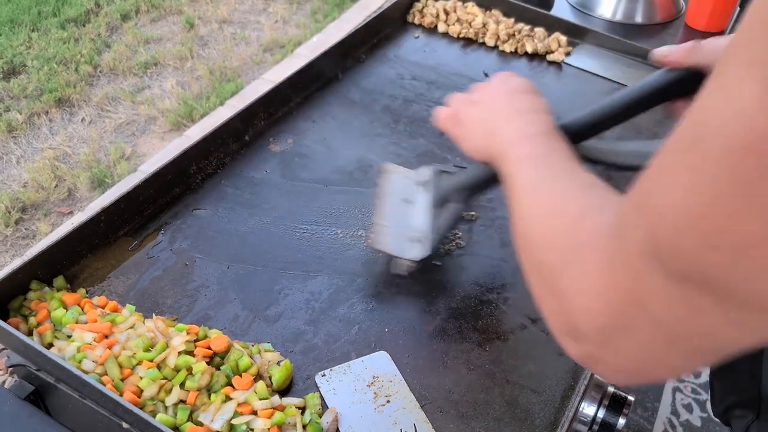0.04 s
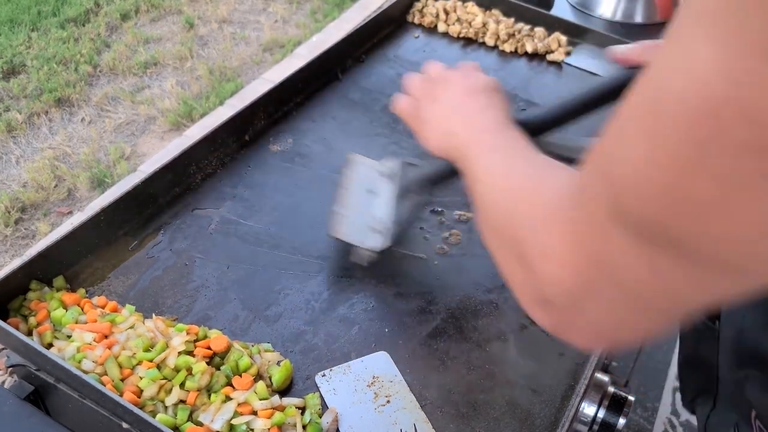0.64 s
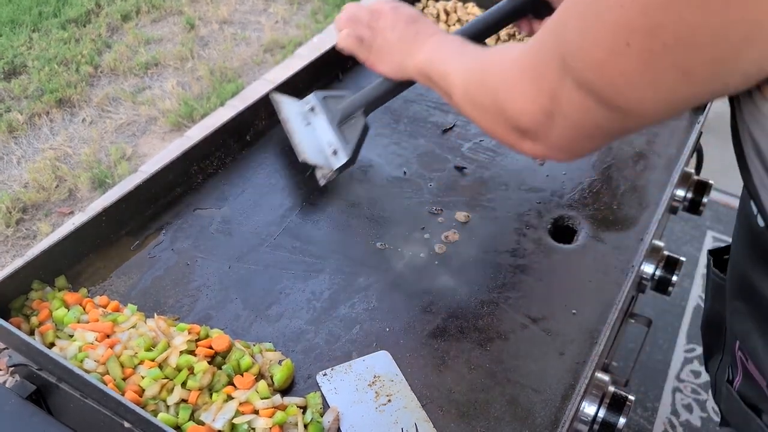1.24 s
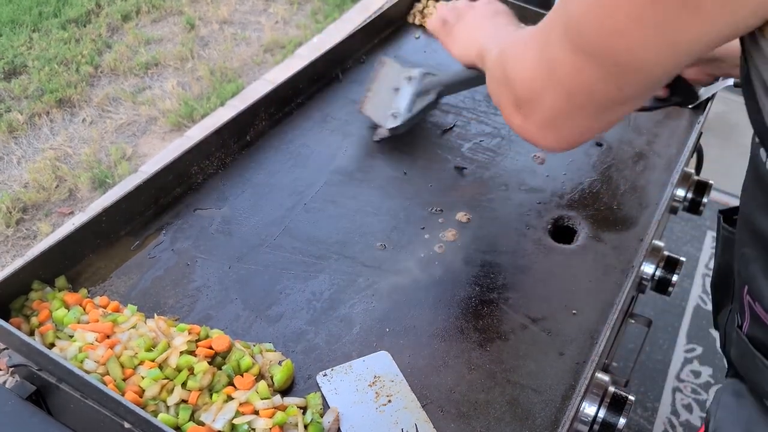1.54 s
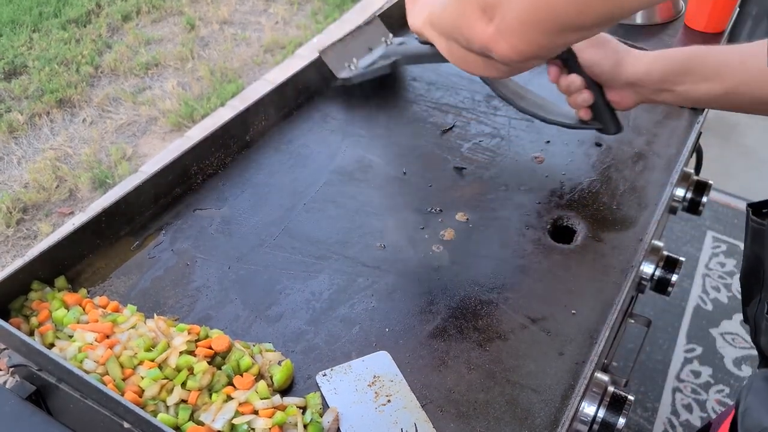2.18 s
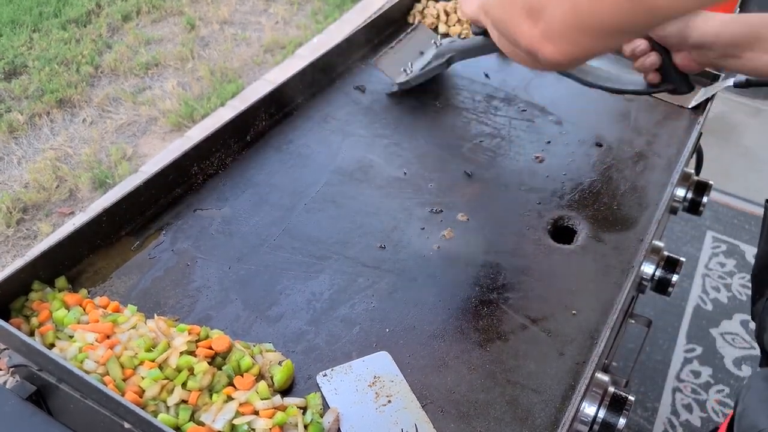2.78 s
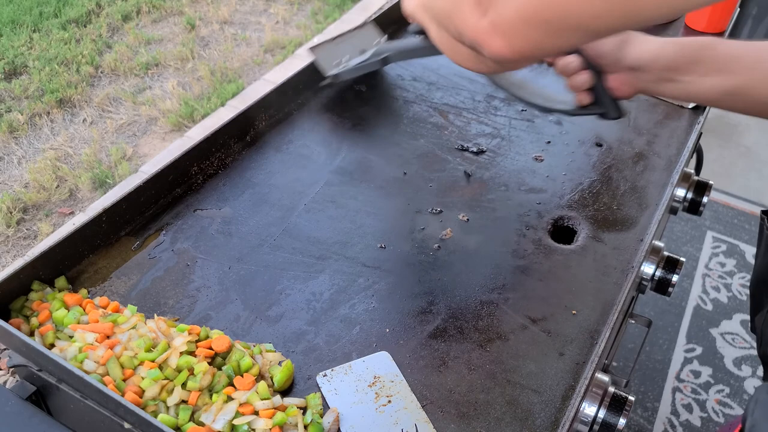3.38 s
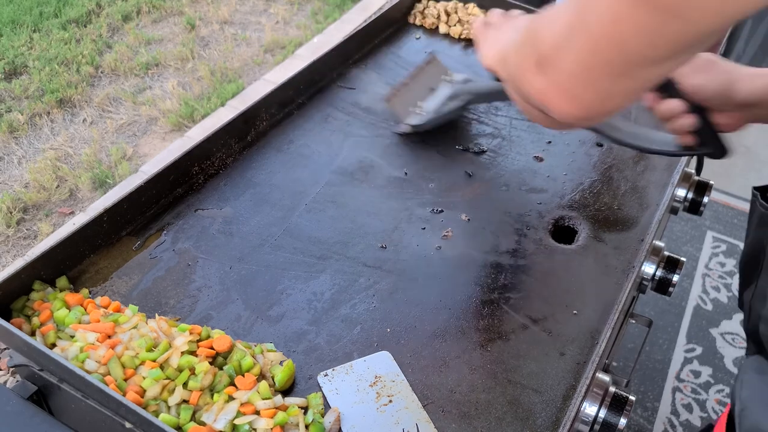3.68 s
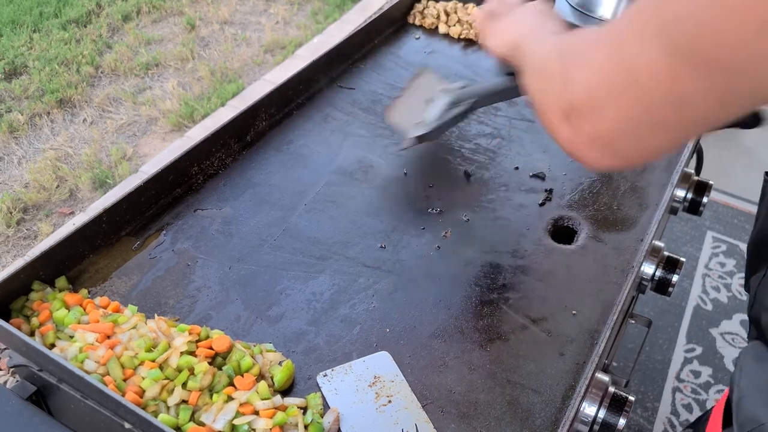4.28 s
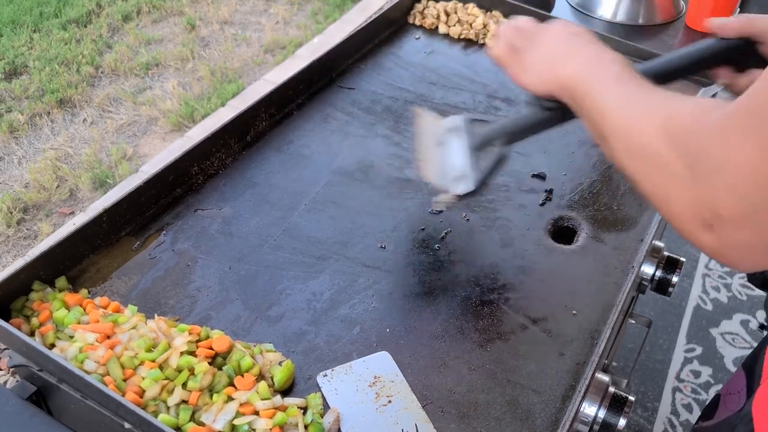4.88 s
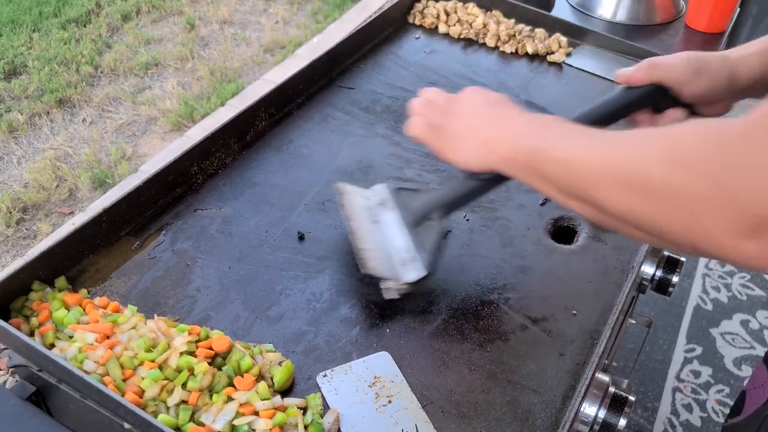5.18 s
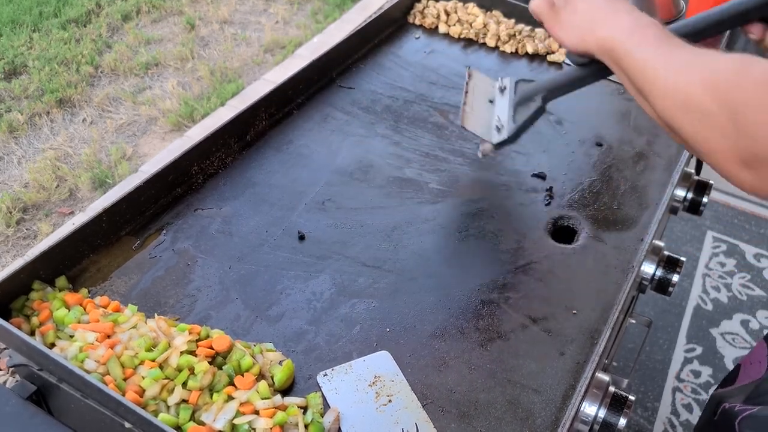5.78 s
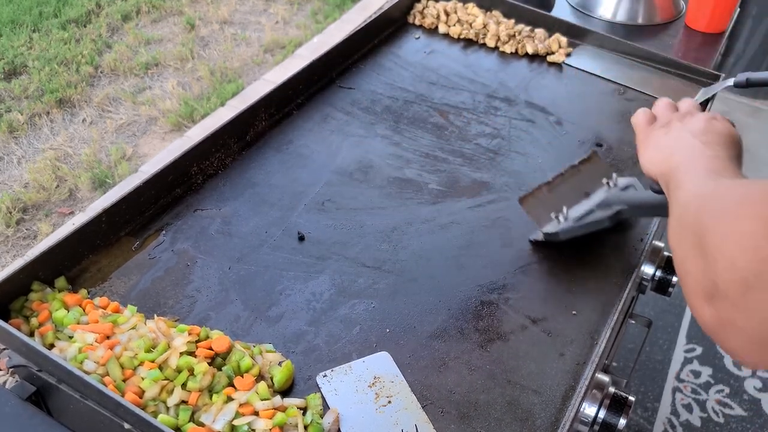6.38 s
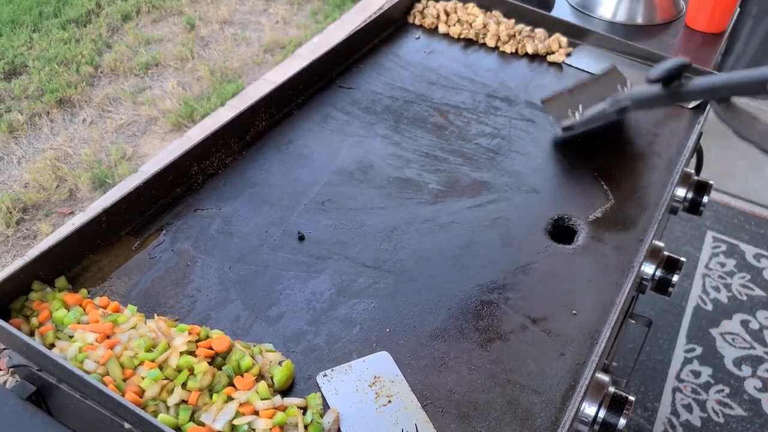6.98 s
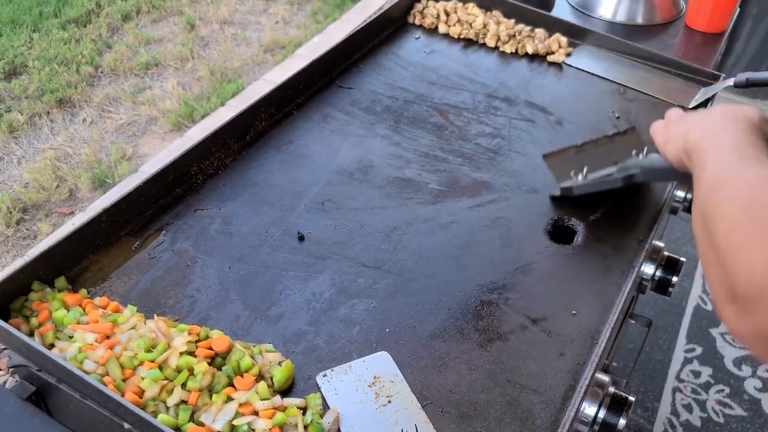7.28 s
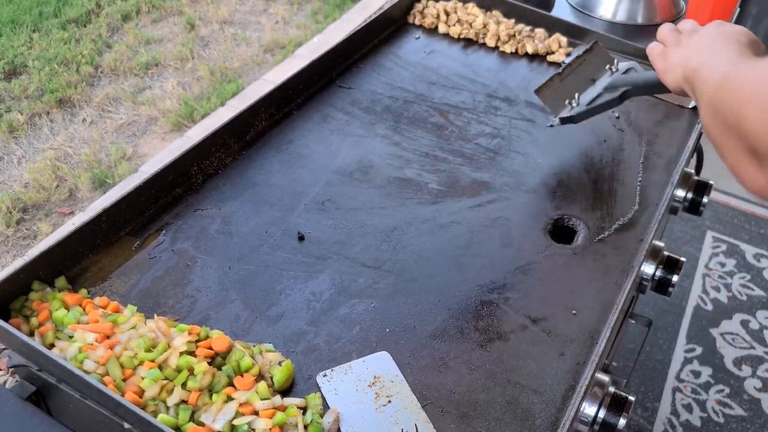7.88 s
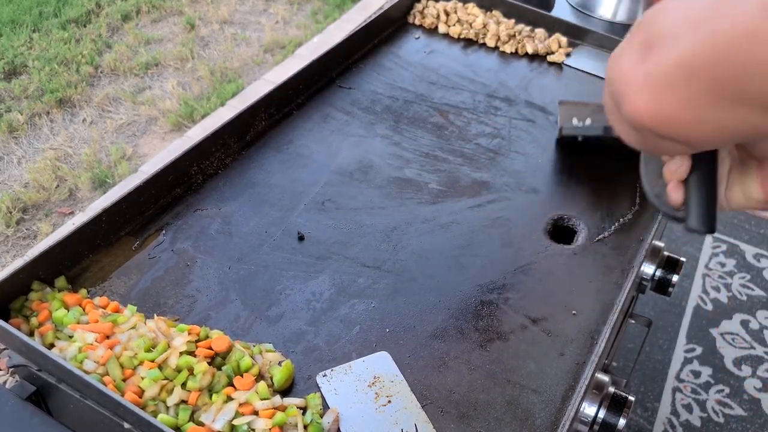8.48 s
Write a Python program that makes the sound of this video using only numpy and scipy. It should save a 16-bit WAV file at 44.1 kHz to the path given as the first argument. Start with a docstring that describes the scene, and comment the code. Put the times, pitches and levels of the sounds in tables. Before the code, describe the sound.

Water sizzles on a hot outdoor griddle as a steel scraper rasps across it in short, gritty strokes, each raising a burst of hiss. The blade clacks down on the heavy plate, judders along the rim and hits it twice with a ringing clang. More strokes and knocks follow while the sizzle fades, leaving softer scraping over the low rumble and hiss of gas burners. The sound is close, with no echo.

```python
"""Water sizzles on a hot gas griddle outdoors as a steel scraper rasps over it in short strokes,
each pushing water onto dry steel in a burst of hiss. Just before 1 s the scraper is set down:
a corner touches, the edge slaps, the blade settles. It then judders along the rim and hits it twice.
More strokes and landings follow while the water boils away. By 6 s the sizzle is faint,
and the scraper works on over the rumble and hiss of the burners."""
import sys
import numpy as np
from scipy import signal
from scipy.fft import rfft, irfft
from scipy.io import wavfile
from scipy.ndimage import uniform_filter1d

SR = 44100
rng = np.random.default_rng(int(sys.argv[2]) if len(sys.argv) > 2 else 0)


def wav_out(sig):
    """Save sig, one row per channel (or a flat mono array), as 16-bit PCM at SR to the path in sys.argv[1]."""
    wavfile.write(sys.argv[1], SR, np.round(np.clip(np.atleast_2d(sig).T, -1, 1) * 32767).astype(np.int16))


N = 381226

RISE_SHARE = 0.48  # part of a stroke spent speeding up
SLOW_DB, SLOW_OCTAVES = 10.5, 0.5  # how much quieter and duller its slow ends are
# Scraper strokes: t/s at top speed, length/s, relative rasp level/dB, middle f/Hz at top speed,
# pitch slide/octaves, level/dB of the water's burst of hiss
STROKES = [(0.142, .244, -31, 3380, -0.51, -35), (0.423, 0.24, -32, 3360, 0.97, -37),
           (.68, 0.19, -31, 3560, 0.42, -38), (1.319, 0.43, -30.5, 1520, -1.1, -38.5),
           (2.187, 0.11, -34, 1400, 0.44, -45), (2.273, 0.12, -36, 2800, 0.06, -28),
           (2.393, 0.18, -36, 2460, -0.49, -35), (2.981, .163, -40.5, 3200, .1, -36.5),
           (3.572, 0.19, -37, 2780, -0.059, -29.5), (3.756, 0.3, -38.5, 2370, -1.3, -42),
           (4.546, 0.33, -36.5, 3850, -1.2, -34.5), (5.339, 0.29, -35, 2660, -0.57, -40),
           (6.247, 0.49, -46.5, 2380, 0.61, -40), (7.217, .36, -46.5, 1730, 1.1, -45),
           (7.436, 0.18, -44, 2240, 0.22, -44.5), (8.479, 0.34, -37, 2110, -0.29, -47)]
# Tone of the blade rubbing on the plate: f/Hz, level/dB
RASP_TONE = [(100, -9), (250, 2), (750, -9.5), (1150, 0), (1900, -1), (3000, -2.5), (4300, -2),
             (5500, -7.5), (7500, -9.5), (16000, -21)]
# Pitches that stand out in the rubbing: f/Hz, width/Hz, boost/dB
RASP_PEAKS = [(1350, 20, 0.9), (1970, 270, 4.2), (3030, 690, 4.7), (3710, 110, 5.5), (4540, 67, 5.7)]
def scraping():
    """The edge rasps over baked-on grit, louder and brighter the faster it moves."""
    grit = grains(per_s=3500, spread_db=0.5, share=0.42) * amp(0.54 * drift(47))
    rasp = colour(grit, RASP_TONE, RASP_PEAKS, band=(1100, 4500))
    hz, t, slices = signal.stft(rasp, SR, nperseg=1024, noverlap=768)  # split by pitch and time
    power = np.zeros(slices.shape[1:])
    for s, length, level_db, centre_hz, glide, _ in STROKES:
        side_s = length * np.where(t < s, RISE_SHARE, 1 - RISE_SHARE)
        slowness = abs(t - s) / side_s  # 0 at top speed, 1 at either end
        shift = glide * np.clip((t - s) / length, -.5, .5) - SLOW_OCTAVES * np.minimum(slowness, 1)
        octaves = np.log2((hz[:, None] + 1) / centre_hz) - shift
        hump = unit(amp(9 * np.exp(-(octaves / 1.1) ** 2)))
        power += (hump * amp(level_db - 5.5 - SLOW_DB * np.minimum(slowness, 2) ** 3)) ** 2
    # the blade bends, so different pitches stand out from moment to moment
    flex = uniform_filter1d(rng.standard_normal(power.shape), size=4, axis=0)
    flex = unit(uniform_filter1d(flex, size=18, axis=1))
    slices = slices * np.sqrt(power) * amp(3.2 * flex)
    return lean_left(signal.istft(slices, nperseg=1024, noverlap=768)[1][:, :N], db=.8)


# The scraper is set down: t/s, corner clack level/dB, wait for the edge/s, edge clack level/dB,
# plate boom level/dB, hardness/dB per octave
LANDINGS = [(0.916, -21, 0.022, -40, -33.5, 3.5), (2.7975, -27, 0.00344, -43, -30.5, 4),
            (4.341, -28.5, .021, -25, -24, 4), (5.044, -28.5, .016, -25.5, -23, -1),
            (5.905, -27, 0.023, -29.5, -25, -1), (7.01, -28.5, .0147, -40, -28, -1.5),
            (8.216, -33.5, .011, -30.5, -26.5, 2.5), (8.26, -28.5, 0.02, -28.5, -28.5, 4.5)]
def landings():
    """A corner touches the plate with a dull thud, the whole edge slaps down, and the blade settles."""
    out = np.zeros((2, N))
    for s, corner_db, delay, edge_db, boom_db, hard_db in LANDINGS:
        out += blow(s, corner_db, boom_db - 2.5, corner_db - 15, corner_db - 16, hard_db - 6)
        out += blow(s + delay, edge_db, boom_db, edge_db - 3.5, edge_db - 16, hard_db)
        settle_db = edge_db - 15  # the blade rocks once more, softly
        out += blow(s + delay + .02, settle_db, boom_db - 4.5, boom_db - 13, settle_db - 16, hard_db=3.5)
    return out


# The scraper runs into the rim: t/s, corner crack level/dB, wait for the edge/s, edge crack level/dB,
# blade clack level/dB, rim clang level/dB
RIM_HITS = [(1.991, -22, .0142, -33, -12.5, -24), (3.4184, -25, .0166, -10.5, -10.5, -14.5)]
def rim_hits(boom_db=-36.5, rebound_s=.014, rebound_db=-9):
    """A corner grazes the rim, the edge strikes in full, and it bounces once."""
    out = np.zeros((2, N))
    for s, corner_db, delay, edge_db, clack_db, clang_db in RIM_HITS:
        strike_db = np.array([clack_db, boom_db, clang_db, edge_db])
        out += blow(s, clack_db - 4, boom_db - 8, clang_db - 8, corner_db, hard_db=10)
        out += blow(s + delay, *strike_db, hard_db=10)
        out += blow(s + delay + rebound_s, *(strike_db + rebound_db), hard_db=-6)
    return out


# Ringing notes of the blade, the thick plate and the thin rim: f/Hz, level/dB, time to fade by 60 dB/s
BLADE_NOTES = [(1740, 3, 0.14), (1900, 3.5, 0.026), (2830, -36, 0.031), (2950, 3, 0.15), (3160, 9.5, 0.036),
               (3680, -26, .06), (4420, -4, 0.15), (6100, 2, 0.029)]
PLATE_NOTES = [(138.4, 2, 0.22), (225.5, 7.5, 0.97), (239, -1, 0.7), (267, -7, 0.53), (334, -2, 0.24),
               (394.5, -1.5, 0.49), (500, -21, 0.22), (504, -4.5, 0.48), (537.3, -1.5, 0.41),
               (568, -16, 0.35), (663, -14, 0.15), (874, -14.5, 0.39)]
RIM_NOTES = [(505, -13, 0.28), (1002, -8.5, 0.52), (1030, 3.5, 0.29), (1103, 4, 0.4), (1214, 1.5, 0.095),
             (1335, 8, 0.29), (1472, 7, 0.17), (1584, -28, 0.052), (1630, -1, 0.18), (1860, 2, 0.31),
             (1750, -18, 0.067), (2100, -10, 0.23)]
# Their many weaker notes, which blur into a noisy "wash": f/Hz, level/dB
BLADE_WASH = [(200, -17), (900, -8), (1700, 2), (2300, 0.5), (3100, 2), (4200, -1.5), (6000, -16),
              (9000, -10.5), (16000, -19)]
PLATE_WASH = [(40, -25), (95, -0.5), (150, -1), (260, 4), (320, -2), (450, -5.5), (720, -23), (1200, -22),
              (2500, -25.5), (8000, -48)]
RIM_WASH = [(80, -27), (280, -3), (700, 2.5), (1000, 1.5), (1400, 3.5), (2000, 1.5), (3000, -5),
            (4500, -13), (8000, -22), (16000, -24)]
# Tone of the sharp crack as steel meets steel: f/Hz, level/dB
CRACK_TONE = [(500, -29), (2000, -26), (5500, 8), (7000, 2), (10000, 0.5), (11800, 5), (13500, -7.5),
              (16000, -14)]
# Where the blade lands, heard as a delay at the left ear: t/s, delay/samples
LEFT_EAR_DELAY = [(3.4, -3), (5, 0), (6, 4), (8.2, 5)]
def blow(s, blade_db, plate_db, rim_db, crack_db, hard_db):
    """One knock of steel on steel: the blade clacks at once, the heavy plate answers more slowly."""
    off_plate = np.clip((rim_db - plate_db) / 10, 0, 1)  # off the plate, the blade rings more purely
    blade = ring(BLADE_NOTES, BLADE_WASH, wash_db=-3.5 - 5.5 * off_plate, fade_s=.12, rise_s=.000068)
    plate = ring(PLATE_NOTES, PLATE_WASH, wash_db=-2.5, fade_s=.44, rise_s=.0009, hard_db=hard_db)
    rim = ring(RIM_NOTES, RIM_WASH, wash_db=-7, fade_s=.31, rise_s=.00039)
    t = np.arange(blade.shape[1]) / SR
    crack = amp(crack_db - 60 * t / 0.074) * colour(noise(len(t)), CRACK_TONE)
    sound = amp(blade_db) * blade + amp(plate_db) * plate + amp(rim_db) * rim + crack
    left_delay_s = np.interp(s, *np.transpose(LEFT_EAR_DELAY)) / SR
    out = np.zeros((2, N))
    add(out[:1], s + left_delay_s, sound[:1])
    add(out[1:], s, sound[1:])
    return lean_left(out, db=.6)


def ring(notes, wash, wash_db, fade_s, rise_s, hard_db=0):
    """Struck steel rings with all its notes at once, plus a wash that drops 60 dB in fade_s."""
    t = np.arange(SR * 3 // 4) / SR
    hz, db, ring_s = np.transpose(notes)[:, :, None]
    db = db + hard_db * np.log2(hz / hz[0])  # a harder knock favours the high notes
    wash = [(f, level + hard_db * min(np.log2(f / hz[0, 0]), np.pi)) for f, level in wash]
    sign = (-1) ** np.arange(len(notes))[:, None]  # neighbouring notes swing opposite ways
    unlike = np.sqrt(np.clip(1 - read(EAR_LIKENESS, hz), 0, 1))
    ear_phase = rng.uniform(-np.pi, np.pi, hz.shape) * unlike / 4
    swing = sign * amp(db - 60 * t / ring_s) / np.linalg.norm(amp(db))
    tones = np.array([(swing * np.sin(2 * np.pi * hz * t + ear * ear_phase)).sum(0) for ear in (-1, 1)])
    blur = amp(wash_db - 60 * t / fade_s) * colour(noise(len(t)), wash)
    return (tones + blur) * (1 - np.exp(-t / rise_s))


def judder(start_s=1.198, hold_s=.2, release_s=.11, slip_s=.0085):
    """The edge sticks and slips unevenly; each slip rings the rim, gritty at first, then purer."""
    out = np.zeros((2, N))
    length = hold_s + release_s
    slips = np.arange(0, length, slip_s)
    for t, (late, strong) in zip(slips, rng.standard_normal((len(slips), 2))):
        bite = 1 - np.exp(-(t + slip_s) / .011)
        pressing_db = 4 * t / length  # the slips grow as the hand presses on
        letting_go_db = -28 * max(t - hold_s, 0) / release_s
        force = bite * amp(-25 + pressing_db + letting_go_db + 2 * strong)
        grit_db = np.interp(t, [0, length], [4, -3])
        slip = ring(RIM_NOTES, RIM_WASH, wash_db=grit_db, fade_s=.05, rise_s=.0004)
        add(out, start_s + t + .002 * late, force * slip)
    return lean_left(out, db=.4)


# Tones of the fine fizz and the coarser bubbling: f/Hz, level/dB
FIZZ_TONE = [(1000, -58), (4000, -15), (7000, -12.5), (9000, -7.5), (10600, 1), (11700, 4), (13000, 1),
             (16000, 2.5)]
BUBBLING_TONE = [(300, -15), (900, -6), (1500, -3), (2800, -2.5), (4000, 3), (5500, 3), (7000, 1),
                 (9000, 4.5), (14000, -12)]
# How much bubbling is mixed into the fizz: t/s, relative level/dB
BUBBLING_LEVEL = [(1.8, -12), (2.3, -10), (4.2, -10.5), (5.6, -13.5)]
# The sizzle dying down as the water boils away: t/s, level/dB
SIZZLE_LEVEL = [(0, -29), (.9, -31.5), (1.5, -30.5), (2.7, -34.5), (3.3, -36.5), (4.1, -37.5), (4.9, -40),
                (5.6, -49.5), (6.8, -53.5), (8.6, -54)]
def sizzle():
    """Countless tiny bubbles burst, flaring up when a stroke pushes water onto dry steel."""
    bubbling_db, = follow(BUBBLING_LEVEL)
    fizz = colour(grains(per_s=2300, spread_db=2.5, share=0.13), FIZZ_TONE, band=(10600, 15800))
    bubbling = colour(grains(per_s=1400, spread_db=2.5, share=0.18), BUBBLING_TONE, band=(5200, 7500))
    spray = fizz * amp(-3.5 + 1.1 * drift(32)) + bubbling * amp(bubbling_db - 1 + .5 * drift(25))
    bursts = [(s, 0.31 * length, burst_db) for s, length, *_, burst_db in STROKES]
    return lean_left(spray * swelling(SIZZLE_LEVEL, bursts), db=.8)


# Tones of the rumble, the open air and the gas jet: f/Hz, level/dB
RUMBLE_TONE = [(12, -14), (25, -11.5), (42, -10), (56, 12), (68, -9.5), (85, -2.5), (105, -14.5),
               (200, -30), (600, -82)]
AIR_TONE = [(60, -2), (100, -2), (137, 4.5), (190, -8), (232, 1), (315, -8), (410, -5.5), (600, -9),
            (800, -11), (1050, -14), (1500, -20.5), (3000, -23), (7000, -35), (16000, -44)]
JET_TONE = [(7500, -50), (9200, -12), (10000, -1), (10500, -12), (12000, -30.5)]
# Slow fall and rise of the flames' rumble: t/s, level/dB
FLAME_LEVEL = [(0, -43), (2.3, -49), (6, -48), (8.6, -41)]
# Short, low, wind-like puffs in the rumble: t/s, half length/s, level/dB
LOW_PUFFS = [(0.673, 0.072, -37), (6.446, 0.078, -43), (7.334, 0.076, -34.5), (7.849, 0.024, -27)]
def burners():
    """Flames rumble in the box under the plate and the gas jet hisses, over a soft outdoor hush."""
    rumble = amp(-0.5) * swelling(FLAME_LEVEL, LOW_PUFFS) * colour(noise(), RUMBLE_TONE, band=(30, 90))
    air = amp(-47.5 + 1.53 * drift(3.5)) * colour(noise(), AIR_TONE)
    jet = amp(-57.5 + .9 * drift(36)) * colour(noise(), JET_TONE)
    return rumble + air + jet


# How alike the sound is at the two ears: f/Hz, likeness (0 unrelated, 1 the same)
EAR_LIKENESS = [(25, .1), (60, 0.93), (130, 0.94), (290, 0.85), (640, 0.36), (1400, 0.041), (3000, 0.16),
                (16000, .15)]
def colour(x, tone, peaks=(), band=(0, SR)):
    """Turns two noises into stereo with the given tone; their average has strength 1 within the band."""
    size = x.shape[1]
    hz = np.fft.rfftfreq(size, 1 / SR)
    peaks_db = sum(db / (1 + (2 * (hz - f) / width) ** 2) for f, width, db in peaks)
    left, other = rfft(x) * amp(read(tone, hz) + peaks_db)
    same = read(EAR_LIKENESS, hz)
    pair = np.array([left, same * left + np.sqrt(1 - same ** 2) * other])
    in_band = irfft(pair.mean(0) * (hz >= band[0]) * (hz <= band[1]), size)
    return irfft(pair, size) / (in_band.std() + 1e-20)


def grains(per_s, spread_db, share):
    """Tiny uneven snaps over a smooth hiss; share is the snaps' part of the power."""
    chance, size, sign, lag = rng.random((4, N))
    at = np.flatnonzero(chance < per_s / SR)
    height = amp(spread_db * np.minimum(-np.log(1 - size[at]), 1.5 * np.pi)) * np.sign(sign[at] - .5)
    ear_gap = np.round(20 * (lag[at] - .5)).astype(int)  # up to 10 samples early or late
    snaps = np.zeros((2, N))
    snaps[0, at] = height
    snaps[1, (at + ear_gap) % N] = height
    return np.sqrt(share) * unit(snaps) + np.sqrt(1 - share) * noise()


def swelling(base, swells):
    """A slow volume curve with short, rounded swells on top."""
    t = np.arange(N) / SR
    base_db, = follow(base)
    swell_power = sum(amp(db) ** 2 * np.exp(-((t - s) / half) ** 2) for s, half, db in swells)
    return np.sqrt(amp(base_db) ** 2 + swell_power)


def drift(rate):
    """A random wobble of strength 1, up to about rate times a second."""
    hz = np.fft.rfftfreq(N, 1 / SR)
    return unit(irfft(rfft(rng.standard_normal(N)) / (1 + (hz / rate) ** 4), N))


def noise(size=N):
    """Two channels of plain hiss (white noise)."""
    return rng.standard_normal((2, size))


def amp(db):
    """Turns decibels into a volume factor."""
    return 10 ** (np.asarray(db) / 20)


def unit(x):
    """Scales a signal to an average strength (rms) of 1."""
    return x / np.sqrt(np.mean(x ** 2) + 1e-20)


def read(points, hz):
    """Looks up frequencies in a table, blending between rows by pitch."""
    f, value = np.transpose(points)
    return np.interp(np.log(hz + 1), np.log(f + 1), value)


def follow(rows):
    """Joins the rows of a time table into curves, one value per sample."""
    s, *columns = np.transpose(rows)
    return [np.interp(np.arange(N) / SR, s, c) for c in columns]


def add(mix, s, sound):
    """Lays a sound into the mix at s seconds."""
    part = mix[:, max(round(s * SR), 0):][:, :sound.shape[1]]
    part += sound[:, :part.shape[1]]


def lean_left(sound, db):
    """Turns the left ear up and the right ear down by db."""
    return sound * amp([[db], [-db]])


def scene():
    """Everything on the griddle, close by and with no echo."""
    return landings() + rim_hits() + judder() + scraping() + sizzle() + burners()


def record(dry, top_hz=15950):
    """Clips peaks at full scale and cuts the very highest treble."""
    low_pass = signal.firwin(801, top_hz, window=("kaiser", 9), fs=SR)
    return signal.oaconvolve(np.clip(dry, -1, 1), low_pass[None], "same")


dry = scene()
out = record(dry)
wav_out(out)
```